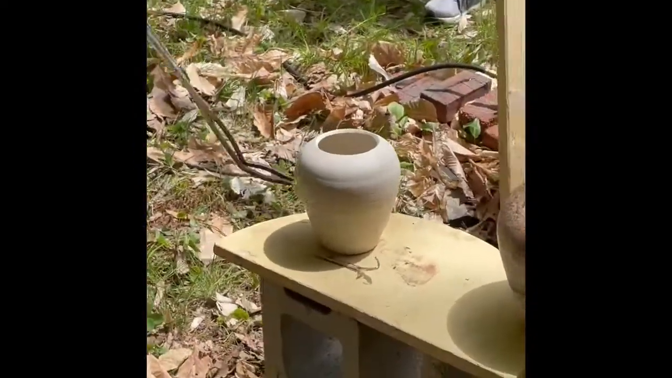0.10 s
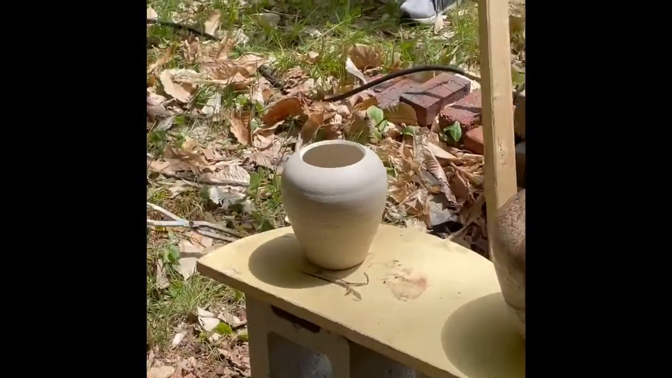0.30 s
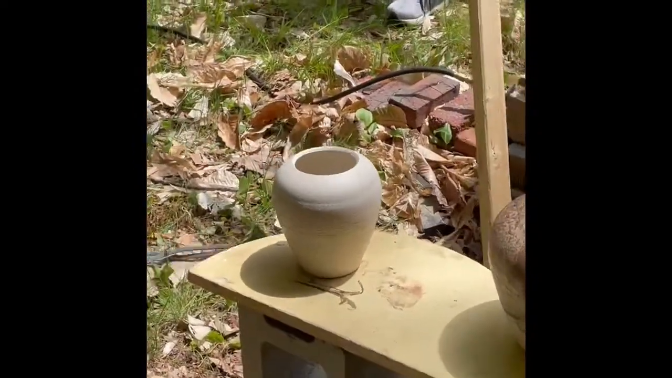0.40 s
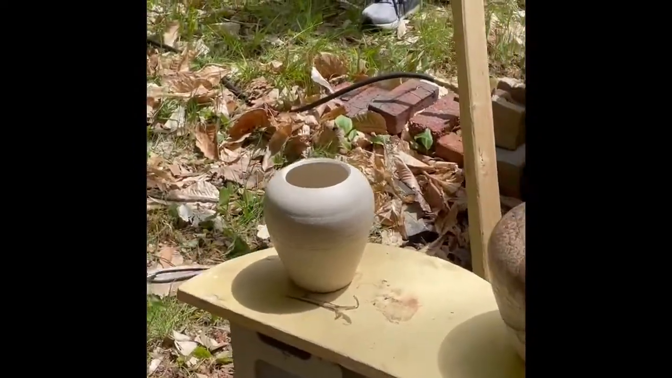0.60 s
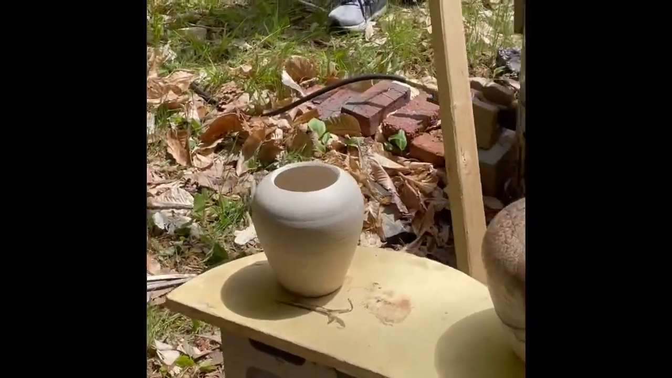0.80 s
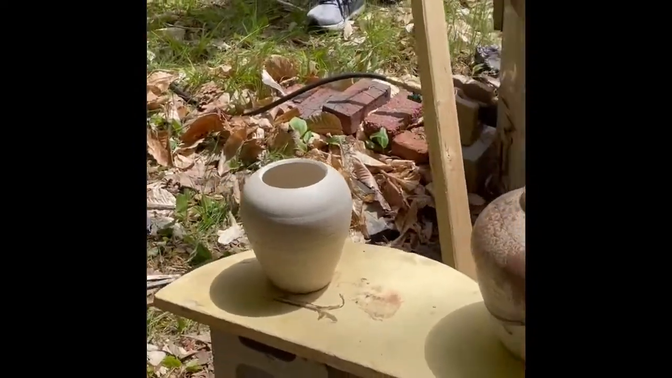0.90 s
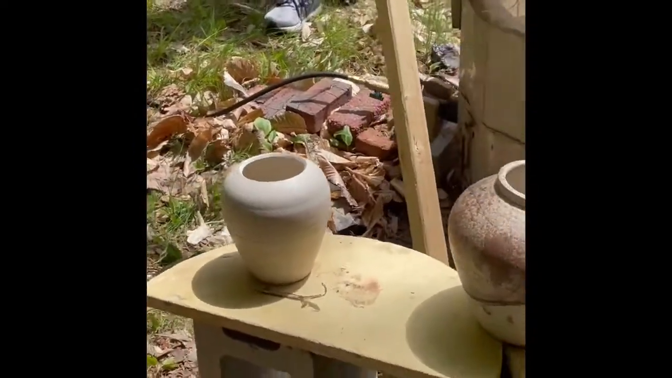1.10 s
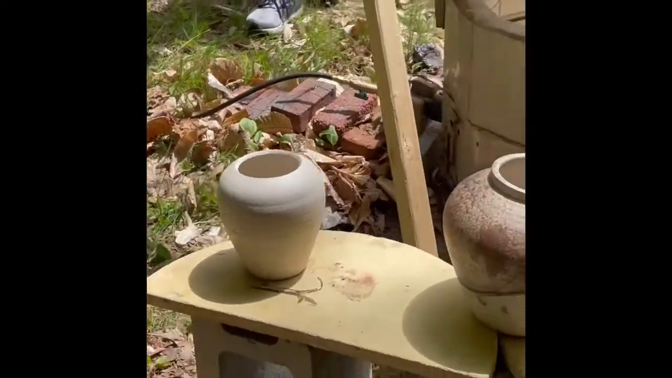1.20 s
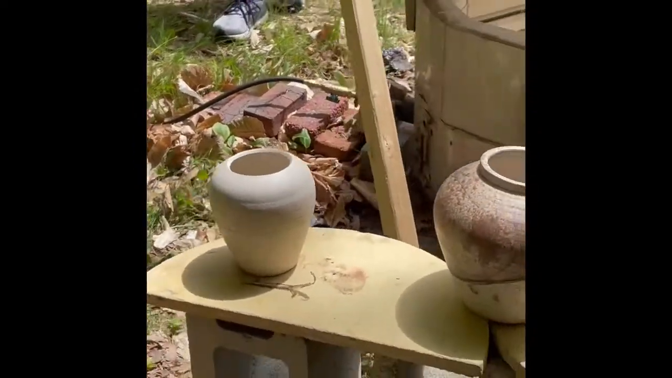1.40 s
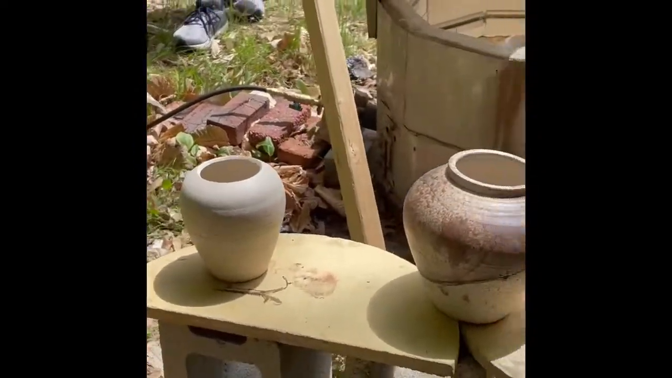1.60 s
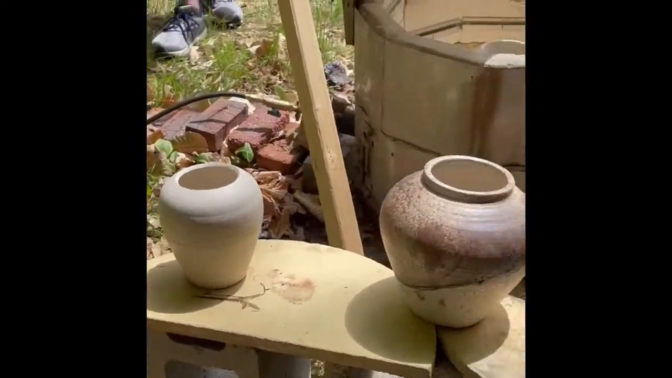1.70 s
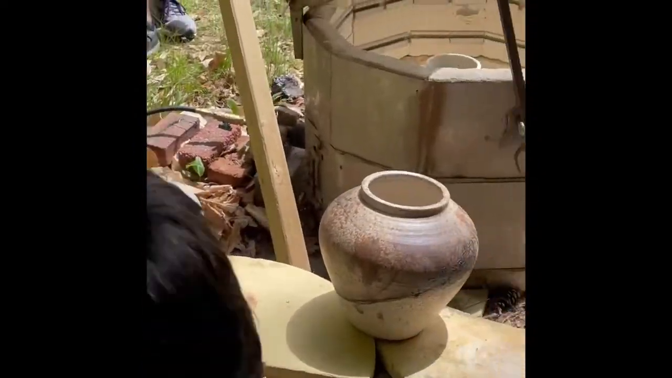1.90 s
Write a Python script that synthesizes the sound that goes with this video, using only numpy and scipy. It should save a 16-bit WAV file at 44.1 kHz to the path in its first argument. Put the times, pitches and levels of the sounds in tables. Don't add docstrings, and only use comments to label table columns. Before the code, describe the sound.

Faint leaf rustle over a very quiet low motor hum. At 0.24 s steel tongs touch lightly, then thump the soil and clatter at 0.34-0.45 s, loudest near 0.39, with a short bright ring. Another clink comes at 0.6 s. From 0.7 s feet shuffle through dry leaves, with crisp snaps clustered around 0.8-0.97, 1.2 and 1.33 s, dull steps near 1.03, and a tiny metallic scrape at 1.42. Rustling thins towards 1.9 s; the hum stops around 1.82.

```python
import sys
import numpy as np
from scipy import signal
from scipy.fft import rfft, irfft
from scipy.io import wavfile

SR = 44100
rng = np.random.default_rng(int(sys.argv[2]) if len(sys.argv) > 2 else 0)


def elevation(decibels):
    levels = np.asarray(decibels, float)
    return 10 ** (levels / 20)


def unload_audio(sound):
    columns = np.transpose(np.atleast_2d(sound))
    steps = np.round(np.clip(columns, -1, 1) * 32767)
    wavfile.write(sys.argv[1], SR, steps.astype(np.int16))


N = 83790
T = np.arange(N) / SR

# f/Hz, spectral level/dB per Hz
CRASH_SPECTRUM = [(700, -18), (1500, -14), (3000, -11), (5500, -4.5), (7500, 1), (12200, 2.5), (13800, -10),
                  (16000, -15)]


def rms_one(x):
    return x / np.sqrt(np.mean(x ** 2) + 1e-20)


def at_hz(points, hz):
    points = np.array(points)
    return np.interp(np.log(hz + 1), np.log(points[:, 0]), points[:, 1])


def colour(x, spectrum):
    gain = elevation(at_hz(spectrum, np.fft.rfftfreq(N, 1 / SR)))
    return rms_one(irfft(rfft(x) * gain, N))


def band_pass(x, low_hz, high_hz):
    return signal.sosfilt(signal.butter(2, [low_hz, high_hz], "band", fs=SR, output="sos"), x)


def drift(rate_hz):
    r = np.exp(-2 * np.pi * rate_hz / SR)
    settled = signal.lfilter([1], [1, -2 * r, r * r], rng.standard_normal(N + SR))[SR:]
    return rms_one(settled)


def ring(clicks, hz, t60):
    r = elevation(-60 / (t60 * SR))
    w = 2 * np.pi * hz / SR
    return signal.lfilter([.5, 0, -.5], [1, -2 * r * np.cos(w), r * r], clicks + 1e-18)


def dying(s, t60, rise_s):
    age = np.maximum(T - s, 0)
    return (1 - np.exp(-age / rise_s)) * elevation(-60 * age / t60)


def tongs():
    # t/s, crash level/dB, crash t60/s, ring level/dB, place (0 jaw, 1 handle, 2 hinge)
    touches = [(.24, -19, 0.029, -40, 1.3), (.2465, -25, 0.071, -36, 1.2), (.306, -37, .1, -48, .1),
               (.3385, -18.5, 0.062, -52, .3), (.364, -28, 0.03, -37, .1),
               (.3853, -11.5, 0.031, -44, 0.088), (.3863, -7.5, 0.033, -29.5, 0.11),
               (.3902, -17.5, 0.014, -26.5, 0.12), (.392, -25, 0.0074, -29, 0.12),
               (.3945, -20, .15, -43, 0.11), (.4238, -12.5, 0.024, -27.5, 0.12),
               (.436, -21.5, 0.082, -37, .05), (.45, -33, 0.055, -36.5, 0.11),
               (.5605, -23, 0.028, -41, 1.2), (.568, -44, 0.029, -32, 1.3), (.597, -30, 0.038, -49, 1.1),
               (.6054, -15.5, 0.023, -28.5, 0.72), (.621, -43, 0.037, -39.5, 1.9),
               (.629, -38, .03, -42, 0.44), (.658, -46, .03, -44, 1.4)]
    # f/Hz, level/dB struck at jaw, at handle, at hinge, t60/s
    long_modes = [(1990, -12, -22, -25, .2), (3030, -9, -18, -14, .16), (3585, -12, -14, -8, .24),
                  (3830, -18, -14, -12, .15), (4158, -7, -16, -16, .17), (4940, -16, -14, -14, .2),
                  (5057, -12, -11, -8, .2), (5293, -4, 0.1, -11, .27), (5690, -10, -7, -3, .14),
                  (6029, -11, -18, -16, .16), (7241, -9, -18, -6, .18), (7348, -14, -10, -12, .22),
                  (7560, -8, -14, -10, .17), (2390, -17, -22, -25, .18)]
    # f/Hz, level/dB struck at jaw, at handle, at hinge, t60/s
    jaw_modes = [(1425, -9, -30, -30, .07), (6570, -14, -12, -8, .12), (8020, -11, -12, -10, .1),
                 (11850, -7, -12, -10, .08), (12290, -6, -9, -10, .1), (13265, -12, -18, -18, .1),
                 (14780, -15, -22, -20, .07), (2810, -15, -22, -22, .2), (8788, -11, -9, -10, .11),
                 (9950, -3, -7, -7, .15), (8930, -11, -9, -10, .07), (9140, -10, -18, -14, .08),
                 (10280, -5, -16, -12, .1), (10965, -8, -11, -10, .07)]
    # f/Hz, level/dB, t60/s
    clang_modes = [(1420, 2, .03), (3600, 1.5, .02), (4180, 3, .03), (5240, 3, .025), (5750, 4, .02),
                   (6400, 1.5, .02), (7250, 3, .025), (7700, 4, .015), (8850, 3, .02), (10700, 3, .02),
                   (11800, 4, .015), (14600, 3, .015)]
    plain_db, clang_db = -6, -24
    jaws_db, wobble_db = 5, 1.8
    contact_s = 0.0012

    s, crash_db, crash_t60, ring_db, place = np.transpose(touches)
    grit = colour(rng.standard_normal(N) * elevation(1.5 * drift(420)), CRASH_SPECTRUM)
    plain = grit * sum(elevation(db) * dying(t, d, 0.0003) for t, db, d in zip(s, crash_db, crash_t60))
    clang = 0
    for hz, db, t60 in clang_modes:
        clang = clang + elevation(db) * ring(plain, hz, t60) / np.sqrt(t60 * SR / 60)

    rings = 0
    age = np.arange(300) / SR
    for hz, *struck_db, t60 in [*long_modes, *jaw_modes]:
        struck = np.interp(place, [0, 1, 2], struck_db)
        luck = rng.normal(0, 1.2, len(s))
        clicks = np.zeros(N)
        clicks[(s * SR).astype(int)] = elevation(ring_db + jaws_db * (hz > 8500) + struck + luck)
        force = np.cos(2 * np.pi * hz * age) + .5 * rng.standard_normal(len(age))
        soft = ring(force * np.exp(-age / contact_s), hz, 0.0031)
        soft = soft / abs(np.sum(soft * np.exp(2j * np.pi * hz * age)))
        rings = rings + ring(signal.fftconvolve(clicks, soft)[:N], hz, t60) * elevation(wobble_db * drift(30))
    return elevation(plain_db) * plain + elevation(clang_db) * clang, rings


def small_part():
    # f/Hz, level/dB
    part_modes = [(3838, 0.5), (6018, 8), (6562, 7), (7143, 5), (7994, -3), (8700, 0.1), (9600, 2),
                  (10917, 4), (11700, 3), (12117, 12), (12758, 8), (15000, -2)]
    nudge_s, nudge_db, scrape_db, part_t60_s = 1.4178, -43, -31, .065
    scrape = colour(rng.standard_normal(N), CRASH_SPECTRUM)
    out = elevation(scrape_db) * scrape * dying(nudge_s, 0.074, 0.0011)
    for hz, db in part_modes:
        force = .5 * np.cos(2 * np.pi * hz * T) + rng.standard_normal(N)
        touch = ring(force * dying(nudge_s, 0.013, 0.0017), hz, 0.0037)
        kick = abs(np.sum(touch * np.exp(2j * np.pi * hz * T)))
        out = out + elevation(nudge_db + db) * ring(touch / kick, hz, part_t60_s) * elevation(2.5 * drift(87))
    return out


def thumps():
    # t/s, peak level/dB, f/Hz, t60/s, exponent of the decay (1 fading, 3 abrupt)
    blows = [(0.242, -34, 111, 0.043, 6), (0.24, -38, 363, 0.029, 1.06), (0.342, -20, 1200, 0.013, 1.1),
             (0.3406, -26.5, 800, 0.013, 0.97), (0.3435, -14.5, 330, 0.012, 1.22),
             (.348, -16, 134, 0.016, 2.1), (0.359, -17.5, 80, 0.0413, 1.44), (0.356, -35, 354, 0.058, 1.84),
             (.37, -15, 132, 0.021, 1.12), (0.387, -29, 138, 0.051, 1.4), (.389, -36, 606, .02, 1.7),
             (0.403, -31, 111, 0.047, 1.08), (0.431, -36, 114, 0.031, 1.8), (.458, -47, 96, 0.047, 2.2),
             (0.522, -38.5, 108, 0.072, 1.37), (0.538, -31, 266, .067, 0.92), (.541, -28, 542, 0.061, 0.88),
             (.543, -30, 1220, .013, 0.85), (0.956, -30.5, 480, 0.016, 0.98),
             (1.017, -36.5, 462, 0.086, 0.99), (1.025, -34, 548, 0.056, 1.65),
             (1.027, -38.5, 280, 0.05, 1.4), (1.039, -35.5, 104, 0.039, 0.97)]
    rise_cycles = 0.05
    out = 0
    for s, db, hz, t60, stop in blows:
        age = np.maximum(T - s, 0)
        sag = 0.093 * t60 * (1 - np.exp(-age / (0.26 * t60))) * 0.25
        swing = np.sin(2 * np.pi * hz * (age + sag))
        rise = 1 - np.exp(-age * hz / rise_cycles)
        out = out + elevation(db) * rise * elevation(-60 * (age / t60) ** stop) * swing
    return out


def snaps():
    # t/s, peak level/dB, f/Hz
    fractures = [(.7105, -33, 5500), (.788, -28, 8500), (.8, -25, 2950), (.807, -17, 9300),
                 (.815, -30, 3960), (.844, -19, 9300), (.8705, -24, 9500), (.872, -29, 4530),
                 (.872, -29, 1600), (.8875, -30, 1200), (.888, -26, 3500), (.897, -26, 9800),
                 (.9335, -25, 8000), (.934, -30, 3500), (.9425, -22, 6500), (.9425, -30, 2500),
                 (.957, -22, 7800), (.957, -29, 2000), (.972, -34, 3300), (1.08, -26, 3500),
                 (1.116, -34, 1300), (1.188, -26, 9500), (1.196, -21, 2500), (1.196, -29, 1300),
                 (1.212, -16, 9500), (1.224, -15, 8000), (1.228, -25, 3500), (1.2285, -29, 1300),
                 (1.326, -20, 8500), (1.331, -22, 8800), (1.335, -16, 7200), (1.407, -27, 8500),
                 (1.41, -33, 4000), (1.587, -28, 8500), (1.592, -26, 4230), (1.622, -29, 7000),
                 (1.669, -29, 4000), (1.738, -43, 2300), (1.763, -41, 7000), (1.795, -38, 9000),
                 (1.795, -38, 1100), (1.815, -42, 4500), (1.857, -36, 8500), (1.869, -36, 6500),
                 (1.87, -43, 900), (1.878, -33, 2700), (1.888, -35, 7000), (1.889, -39, 1800)]
    cycles, sharpens = 2.0, .4
    out = np.zeros(N + SR)
    age = np.arange(400) / SR
    for s, db, hz in fractures:
        noise = rng.standard_normal(400)
        t60 = cycles * (hz / 3000) ** sharpens / hz
        crack = (1 + 0.26 * noise) * np.exp(-age / .00003) + 0.08 * noise * np.exp(-age / 0.001)
        burst = ring(ring(crack, hz, t60), hz, t60)
        start = int(s * SR) - 8
        out[start:start + 400] += elevation(db) * burst / np.abs(burst).max()
    return out[:N]


def leaves():
    # t/s, level/dB
    shuffle = [(0, -49.5), (.09, -45), (.22, -48.5), (.3, -40), (.5, -49), (.66, -45), (.76, -49.5),
               (.82, -41.5), (.95, -42.5), (.98, -54), (1.07, -44.5), (1.2, -44), (1.35, -43), (1.45, -49),
               (1.6, -41.5), (1.71, -48.5), (1.76, -61.5), (1.9, -49.5)]
    # f/Hz, spectral level/dB per Hz
    rustle = [(120, -17.5), (500, -3.5), (1500, -3.5), (6000, -4), (8500, 2), (12200, 4), (13500, -13.5),
              (16000, -12)]
    rustle_db, hiss_db, flicker_db = 4.5, -3, 1.6
    grains_per_s, grain_spread_db = 2500, 1.5

    clump = 0.36 * drift(11) + .7 * drift(60)
    sizes = elevation(grain_spread_db * np.minimum(rng.exponential(1, N), 4)) * rng.choice([-1, 1], N)
    grains = rms_one(sizes * (rng.random(N) < grains_per_s * elevation(3 * clump) / SR))
    raw = colour(grains + elevation(hiss_db) * rng.standard_normal(N), rustle)
    edges = 125 * 2. ** np.arange(8)
    out = 0
    for k, (low, high) in enumerate(zip(edges, edges[1:])):
        band = band_pass(raw, low, high * 1.04)
        out = out + (-1) ** k * band * elevation(flicker_db * drift(17) + 1.23 * clump)
    return elevation(rustle_db + np.interp(T, *np.transpose(shuffle))) * out


def crushes():
    # t/s, level/dB, length/s, bottom f/Hz, top f/Hz
    footfalls = [
        (0.335, -29, 0.03, 288, 3800),
        (0.55, -43.5, 0.1, 110, 450),
        (0.881, -54.5, 0.12, 145, 606),
        (1.061, -44.5, 0.037, 112, 573),
        (1.573, -52, 0.13, 292, 910),
    ]
    out = 0
    for s, db, length, low_hz, top_hz in footfalls:
        low = band_pass(rng.standard_normal(N) * elevation(7 * drift(40)), low_hz, top_hz)
        age = np.maximum(T - s, 0) / length
        out = out + elevation(db) * rms_one(low) * (1 - np.exp(-age / 0.015)) * np.exp(-age ** 2)
    return out


def hum():
    hum_hz, waver_db, hum_db, rumble_db = 73, 4.5, -58.5, -63
    swell_s, stop_s = 0.37, 1.82
    swell = .5 + .5 * np.clip(T / swell_s, 0, 1)
    stop = 1 / (1 + np.exp((T - stop_s) / 0.0072))
    tone = np.sin(2 * np.pi * np.cumsum(hum_hz + 2.34 * drift(9.9)) / SR)
    rumble = rms_one(band_pass(rng.standard_normal(N), 45, 200))
    return elevation(hum_db + waver_db * drift(2.5)) * swell * stop * tone + elevation(rumble_db) * rumble


def scene():
    ground = leaves() + crushes() + hum() + thumps()
    crash, rings = tongs()
    sharp = snaps() + crash
    uneven = elevation(-17) * np.roll(sharp, 9) * [[1], [-1]]
    return ground + sharp + rings + small_part() + uneven


def low_pass(x):
    return signal.sosfilt(signal.butter(12, 16800, fs=SR, output="sos"), x)


def record(dry):
    # f/Hz, phase/rad
    port_lead = [(60, 0), (5750, 0), (9450, np.pi), (10750, np.pi), (12600, 4.5), (13200, 5.5),
                 (13800, 2 * np.pi)]
    # f/Hz, width/octaves, phase/rad, left louder/dB
    port_turns = [(750, 1, 0.84, 0.3), (4770, 0.22, 1.11, -0.5)]
    hz = np.fft.rfftfreq(N, 1 / SR)
    turn = 1j * at_hz(port_lead, hz)
    for mid_hz, octaves, rad, db in port_turns:
        bump = np.exp(-(np.log2((hz + 1) / mid_hz) / octaves) ** 2)
        turn = turn + (1j * rad + np.log(elevation(db))) * bump
    x = irfft(rfft(dry) * np.exp(.5 * turn * [[1], [-1]]), N)
    x = 1.3 * np.tanh(x / 1.3)
    x = signal.sosfilt(signal.butter(3, 45, "high", fs=SR, output="sos"), x)
    x = signal.sosfilt(signal.cheby2(12, 50, 16600, fs=SR, output="sos"), x)
    return low_pass(x)


dry = scene()
out = record(dry)
unload_audio(out)
```